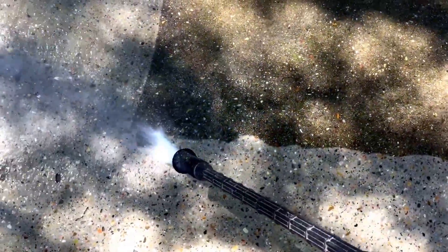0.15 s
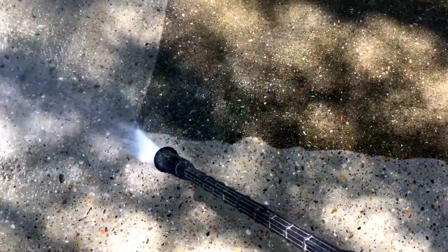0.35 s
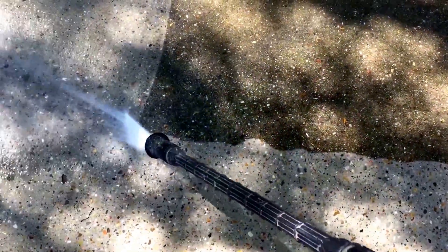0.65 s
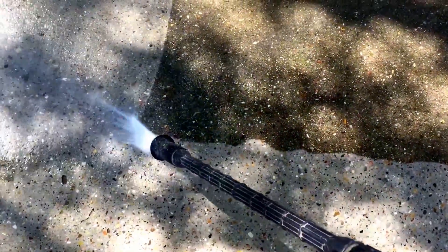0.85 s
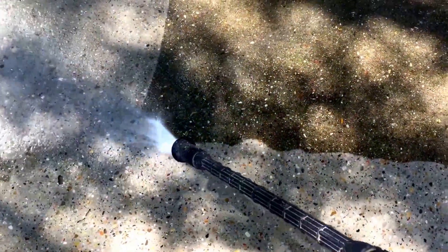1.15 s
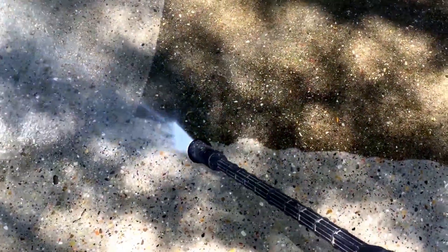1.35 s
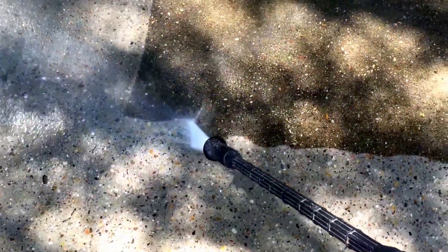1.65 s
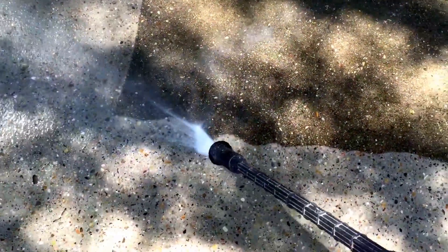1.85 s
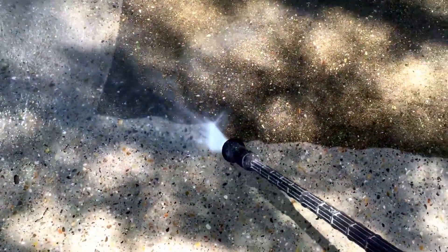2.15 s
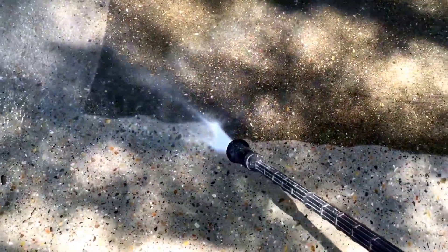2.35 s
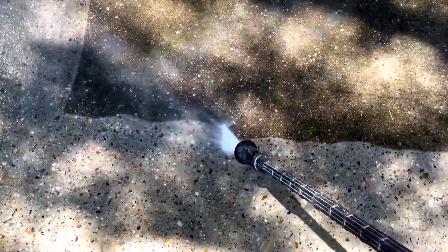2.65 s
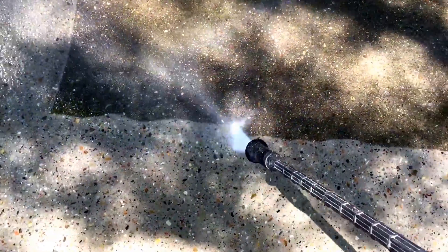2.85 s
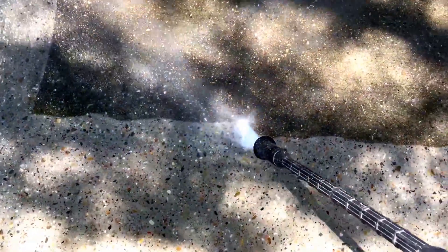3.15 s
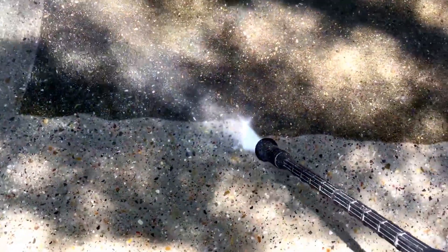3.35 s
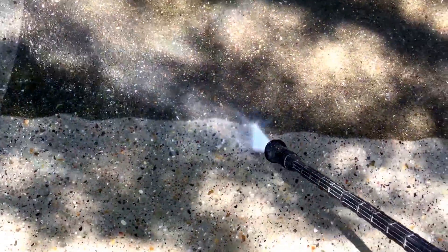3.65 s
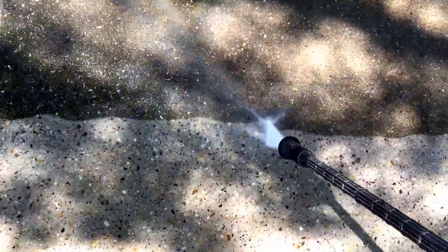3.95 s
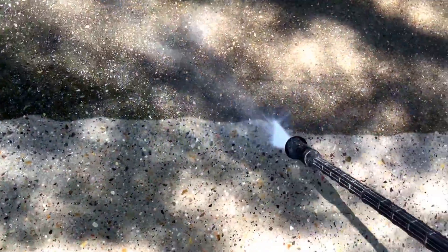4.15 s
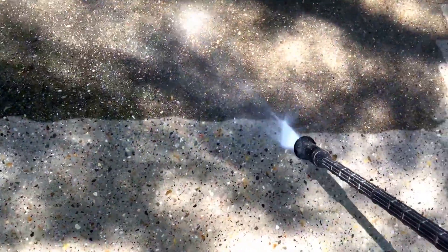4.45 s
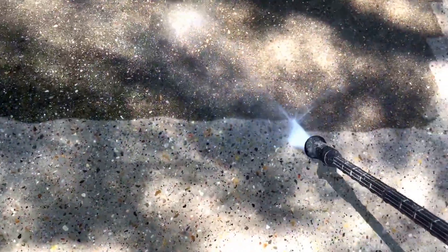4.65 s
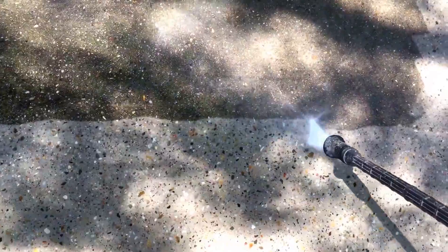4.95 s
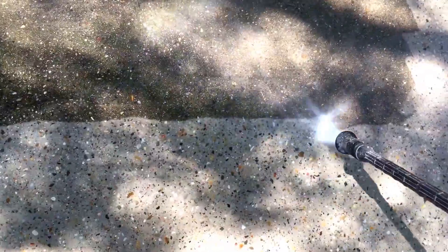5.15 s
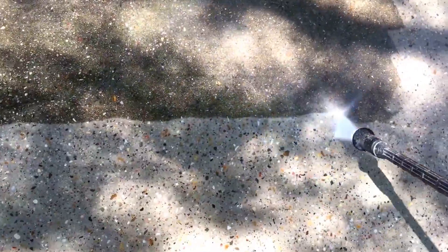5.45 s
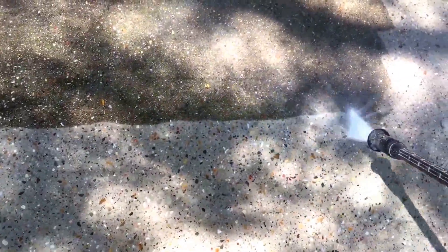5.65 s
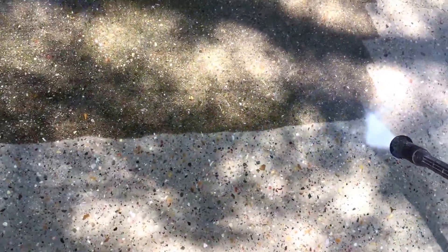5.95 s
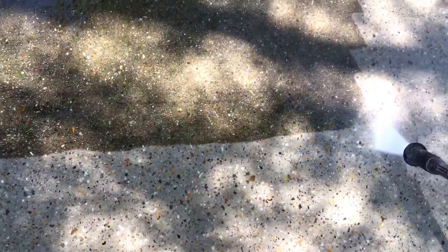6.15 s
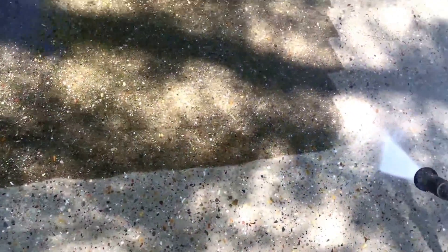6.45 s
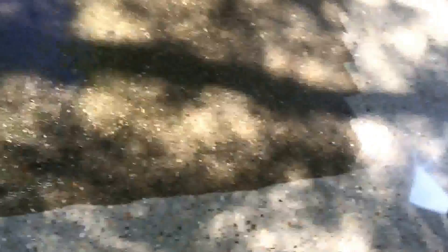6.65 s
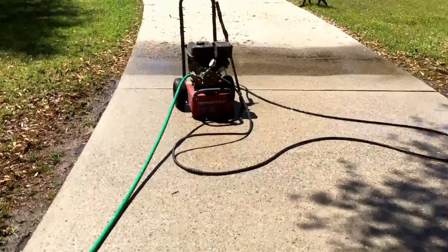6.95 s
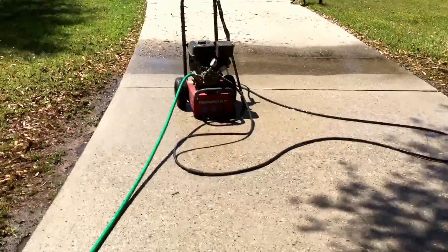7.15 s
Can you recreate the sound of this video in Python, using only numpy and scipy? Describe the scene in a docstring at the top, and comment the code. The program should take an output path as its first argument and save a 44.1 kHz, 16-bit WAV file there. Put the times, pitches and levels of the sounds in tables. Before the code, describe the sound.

Close, bright pressure-washer spray blasts a driveway while a one-cylinder engine drones and rattles; near the end everything drops suddenly to faint dull machine noise.

```python
"""On a concrete driveway, a petrol pressure washer is at work, with its wand close to the microphone.
The one-cylinder engine drones as a sum of partials, and its rattle is noise that beats with the pump.
The jet is hissing noise with hard drops in it, the water roars on the slab, and air thumps the microphone.
The sound then cuts to the running machine, much fainter: a low hum, dull noise, a rustle and small ticks."""
import sys
import numpy as np
from scipy import signal
from scipy.fft import rfft, irfft, next_fast_len
from scipy.io import wavfile

SR = 44100
rng = np.random.default_rng(int(sys.argv[2]) if len(sys.argv) > 2 else 0)


def store_pcm(level_fs):
    """Save levels as 16-bit WAV."""
    pcm = np.round(np.clip(level_fs, -1, 1) * 32767).astype(np.int16)
    wavfile.write(sys.argv[1], SR, np.atleast_2d(pcm).T)


N = 322803
T = np.arange(N) / SR  # time of every sample, in seconds
CUT_S = 6.8315  # the close work ends and the faint machine begins
TOP_HZ = 15720  # hardly anything is heard above this
PUMP_STROKES_PER_CYCLE = 6

# In every colour table, the levels only count relative to each other.

# The engine's governed speed, in firings per second.
GOVERNED_HZ = 25.079
# Under a sudden load the speed drops quickly and is won back slowly.
SAG_FALL_S, SAG_RECOVER_S = 0.07, 0.28
# Sags of the engine speed: lowest point t/s, depth/firings per second
SPEED_SAGS = [(.07, .11), (.3, .41), (1.26, .22), (1.66, .41), (2.92, .53), (4.13, .25), (4.84, .53),
              (5.47, .26), (6.19, .17)]
# Piston strokes of one firing cycle: place in the cycle/0-1, level/dB
PISTON_STROKES = [(.026, -.9), (.265, -2.5), (.451, 0), (.716, .3)]
# Strength the muffler gives each partial: multiple of the firing rate, relative level/dB
EXHAUST_PARTIALS = [(1, -31.5), (2, -7), (3, -10.5), (4, 0.5), (5, -3), (6, -3), (7, -20.5), (8, 0.5),
                    (9, -6.5), (10, -7.5), (11, -3.5), (12, -14.5), (13, -30.5), (14, -10), (15, -9.5),
                    (16, -15), (17, -15), (18, -25.5)]

# Loudness of the engine and pump rattle: t/s, level/dB
RATTLE_LEVEL = [(0, -30), (1.8, -29.8), (3, -28.5), (5.2, -28.8), (6.4, -31.5), (6.8, -30)]
# Colour of the rattle: f/Hz, level/dB
RATTLE_COLOUR = [(100, -37.5), (270, -19), (480, -22), (600, -11), (800, -6), (1000, -1.5), (1130, -1),
                 (1230, 0.5), (1450, -1.5), (1650, -7), (1850, -13.5), (2300, -19), (2900, -30),
                 (8000, -51.5)]

# The jet on the concrete: t/s, hiss level/dB, lift of the fine mist/dB
JET_LEVEL = [(0, -19.1, 1.8), (2.6, -19.5, 1), (3.05, -19.5, 0), (5.8, -20, 0.3), (6.82, -20.6, -2)]
# The wand swings to the right, then partly back: t/s, share of the way/0-1
WAND_SWING = [(0, 0), (2.7, 0.16), (2.9, 0.4), (4.2, 0.68), (5.2, 1), (6.1, .95), (6.8, 0.6)]
# Colour of the hiss at the left end of the swing: f/Hz, level/dB
HISS_LEFT_COLOUR = [(300, -32), (1500, -14.5), (2000, -4), (2500, -7), (2930, -4.5), (3400, -4),
                    (4400, -0.5), (5400, 1.5), (6800, -1), (7800, -6.5), (9000, -0.9), (10000, -3.5),
                    (12500, -9.5), (15700, -8.5)]
# Colour of the hiss at the right end of the swing: f/Hz, level/dB
HISS_RIGHT_COLOUR = [(300, -25), (1900, -10.5), (2500, -5.5), (3100, -11.5), (3900, -7), (4600, -6),
                     (5400, -2.5), (6600, -1.2), (7700, -5.5), (8800, -4.5), (10000, -6.5), (12500, -6),
                     (15700, -8)]

# Loudness of the water's low roar on the slab: t/s, level/dB
ROAR_LEVEL = [(0, -38.5), (.9, -34), (2, -39), (5.7, -39.7), (6.2, -36), (6.8, -38)]
# Colour of the roar: f/Hz, level/dB
ROAR_COLOUR = [(150, -32), (300, -6.5), (460, -7.5), (600, -1), (750, -1), (1100, -8), (2000, -30.5)]

# The steady draught with the wand at each end of its swing.
DRAUGHT_LEFT_DB, DRAUGHT_RIGHT_DB = -38.5, -47
# Gusts on the microphone: peak t/s, spread to each side of it/s, level/dB
DRAUGHT_GUSTS = [(0.55, .07, -34), (1.1, .13, -34.5), (1.45, .1, -38), (1.82, 0.11, -35),
                 (2.68, .17, -35.5), (3.42, .08, -35), (3.61, .05, -36), (5.07, .05, -38), (5.24, .07, -37)]
# Colour of the draught: f/Hz, level/dB
DRAUGHT_COLOUR = [(15, -37), (32, -18.5), (48, -3.5), (70, 2.5), (100, 0), (160, -2.5), (240, -7.5),
                  (400, -16), (900, -41)]

# The noise behind the faint machine starts at this level and slowly rises.
FAINT_START_DB, FAINT_RISE_DB_PER_S = -54.5, 4
# Colour of that noise: f/Hz, level/dB
FAINT_COLOUR = [(24, -38), (45, -11), (100, 3.5), (170, -9), (205, -1.5), (280, -25), (370, -21),
                (470, -29), (720, -8.5), (1000, -8.5), (1300, -7.5), (1650, -11.5), (2100, -23),
                (2700, -29), (4500, -39), (6200, -40), (15000, -54)]

# The rustle starts with the faint machine and dies away.
RUSTLE_START_DB, RUSTLE_FADE_DB_PER_S = -66, 31
# Small ticks: t/s, level/dB, share of dull knock/0-1
SMALL_TICKS = [(6.899, -64, .3), (6.972, -50, .6), (7.049, -50, .7), (7.061, -47, .9), (7.0698, -41, 0.2),
               (7.144, -58, .9)]
# Colour of the rustle and of the crisp part of a tick: f/Hz, level/dB
CRISP_COLOUR = [(300, -7), (1400, 6), (3000, -1), (4300, -7), (6500, 0), (9000, -7), (15000, -15)]
# Colour of the dull knock in a tick: f/Hz, level/dB
DULL_COLOUR = [(100, -12), (350, -4), (1400, -1), (2800, -4), (5000, -22), (12000, -35)]

# Narrow dips made by the microphone port: f/Hz, width/Hz, level/dB
MICROPHONE_DIPS = [(4890, 300, -3.5), (10440, 700, -4)]


def amp(db):
    """Turns decibels into a gain."""
    return 10 ** (np.asarray(db) / 20)


def unit(x):
    """Scales a signal to an rms of 1."""
    return x / np.sqrt(np.mean(x ** 2) + 1e-20)


def curve(rows, axis=1):
    """Reads one column of a time table at every sample."""
    rows = np.asarray(rows)
    return np.interp(T, rows[:, 0], rows[:, axis])


def colour(x, points):
    """Filters by a spectrum drawn on a log-frequency axis, then scales to rms 1."""
    hz, db = np.transpose(points)
    f = np.fft.rfftfreq(len(x), 1 / SR)
    gain = amp(np.interp(np.log(f + 1), np.log(hz), db))
    return unit(irfft(rfft(x) * gain, len(x)))


def noise(points):
    """Makes steady noise of a given colour."""
    return colour(rng.standard_normal(next_fast_len(N)), points)[:N]


def wander(rate_hz):
    """Makes a smooth random curve of rms 1, with little change faster than the given rate."""
    size = next_fast_len(N)
    f = np.fft.rfftfreq(size, 1 / SR)
    slow = rfft(rng.standard_normal(size)) / (1 + (f / rate_hz) ** 4)
    return unit(irfft(slow, size)[:N])


def hollow(x, hz, depth, width_hz=400):
    """Cancels a narrow band around a moving frequency."""
    # shift the band down to 0 Hz, smooth away the rest, then shift it back
    turn = np.exp(2j * np.pi * np.cumsum(hz) / SR)
    r = np.exp(-np.pi * width_hz / SR)
    low = signal.lfilter([1 - r], [1, -r], x / turn)
    band = 2 * (turn * low).real
    return x - np.clip(depth, 0, 1) * band


def firing_cycles():
    """Counts the engine's firings: a governed speed, with sags that share one shape."""
    speed = np.full(N, GOVERNED_HZ)
    for lowest_s, depth in SPEED_SAGS:
        side_s = np.where(T < lowest_s, SAG_FALL_S, SAG_RECOVER_S)
        speed = speed - depth * np.exp(-abs(T - lowest_s) / side_s)
    return np.cumsum(speed) / SR


def pump_wave(cycle):
    """The pump's push: three strokes to each of the two engine turns in a firing cycle."""
    return np.cos(2 * np.pi * PUMP_STROKES_PER_CYCLE * cycle)


def swing():
    """Where the wand points: 0 is left, 1 is right."""
    return np.clip(curve(WAND_SWING), 0, 1)


def since_cut():
    """Seconds since the faint machine began."""
    return np.maximum(T - CUT_S, 0)


def exhaust(cycle, unsteady=0.034, jitter_cycles=0.0016):
    """Each piston stroke pushes a puff through the muffler, which colours the partials of the note."""
    order, db = np.transpose(EXHAUST_PARTIALS)
    # the puffs strengthen or weaken each other, differently for every partial
    puffs = -sum(amp(d) * np.exp(-2j * np.pi * order * place) for place, d in PISTON_STROKES)
    # the muffler holds the upper partials back a little
    lags = np.angle(puffs) - 0.004 * order ** 2
    # no two firings are quite alike
    uneven = cycle + jitter_cycles * wander(14)
    note = np.zeros(N)
    # only the timing of the puffs is used: the table already gives the strengths
    for k, d, lag in zip(order, db, lags):
        note = note + amp(d) * np.cos(2 * np.pi * k * uneven + lag)
    return unit(note) * (1 + unsteady * wander(13.5))


def rattle(cycle, beat=0.12, flutter_db=1.0):
    """Valve gear and pump pistons shake the casing: noise that beats with the pump strokes."""
    strokes = 1 + beat * pump_wave(cycle)
    level_db = curve(RATTLE_LEVEL) + flutter_db * wander(30)
    return noise(RATTLE_COLOUR) * strokes * amp(level_db)


def water_impacts(drops_per_s=2500, drops_db=-9):
    """Water shatters on the concrete: dense noise with single hard drops of random strength."""
    size = next_fast_len(N)
    strength_db = 4 * np.minimum(rng.exponential(1, size), 2.5)
    lands = rng.random(size) < drops_per_s / SR
    drops = rng.choice([-1, 1], size) * amp(strength_db) * lands
    return rng.standard_normal(size) + amp(drops_db) * unit(drops)


def jet(cycle, ripple=0.066, grit_fast_db=0.28, grit_slow_db=0.32, mist_hz=10500):
    """The impacts of the water make a hiss, coloured by the wand's swing and pulsing with the pump."""
    impacts = water_impacts()
    way = swing()
    left = colour(impacts, HISS_LEFT_COLOUR)[:N]
    right = colour(impacts, HISS_RIGHT_COLOUR)[:N]
    hiss = (1 - way) * left + way * right
    # a near reflection cancels one band, which rises and fills in as the wand swings away
    null_hz = 2870 + 250 * way
    null_depth = 0.73 * (1 - 1.4 * way)
    hiss = hollow(hiss, null_hz, null_depth)
    # the finest droplets give the top of the hiss
    high_pass = signal.butter(4, mist_hz, "high", fs=SR, output="sos")
    mist = signal.sosfiltfilt(high_pass, hiss)
    hiss = hiss + mist * (amp(curve(JET_LEVEL, axis=2)) - 1)
    # the jet crosses pebbles and pits in the concrete
    grit_db = grit_fast_db * wander(70) + grit_slow_db * wander(11)
    pulse = 1 + ripple * pump_wave(cycle)
    return unit(hiss) * pulse * amp(curve(JET_LEVEL) + grit_db)


def roar(flutter_db=0.5):
    """The sheet of water driven across the slab: low noise with a slight flutter."""
    return noise(ROAR_COLOUR) * amp(curve(ROAR_LEVEL) + flutter_db * wander(14))


def draught(lumps_db=1.0):
    """Air dragged along by the spray thumps the microphone: less with the wand at the right, more in gusts."""
    steady = amp(DRAUGHT_LEFT_DB + (DRAUGHT_RIGHT_DB - DRAUGHT_LEFT_DB) * swing())
    power = steady ** 2
    for peak_s, spread_s, db in DRAUGHT_GUSTS:
        gust = amp(db) * np.exp(-0.5 * ((T - peak_s) / spread_s) ** 2)
        power = power + gust ** 2
    return noise(DRAUGHT_COLOUR) * np.sqrt(power) * amp(lumps_db * wander(6))


def faint_machine(cycle, muffle_hz=220):
    """The running machine, faint and dull: its low exhaust hum and noise, without the hiss of the jet."""
    air_db = FAINT_START_DB + FAINT_RISE_DB_PER_S * since_cut()
    air = amp(air_db) * noise(FAINT_COLOUR)
    low_pass = signal.butter(2, muffle_hz, fs=SR, output="sos")
    # the gain acts on the whole exhaust note, before the low-pass takes its share
    hum = signal.sosfilt(low_pass, amp(-62) * exhaust(cycle, unsteady=0.2))
    return hum + air + rustle_and_ticks()


def rustle_and_ticks(decay_s=0.0012, tail_s=0.018, tail_db=-19, crinkle_db=3.5):
    """A soft uneven rustle, and short bursts of noise that are part crack and part knock."""
    crisp, dull = noise(CRISP_COLOUR), noise(DULL_COLOUR)
    rustle_db = RUSTLE_START_DB - RUSTLE_FADE_DB_PER_S * since_cut() + crinkle_db * wander(90)
    out = crisp * amp(rustle_db)
    for start_s, db, knock in SMALL_TICKS:
        age = abs(T - start_s)
        # a quick fall, then a weaker and longer tail
        fall = (T >= start_s) * (np.exp(-age / decay_s) + amp(tail_db) * np.exp(-age / tail_s))
        out = out + amp(db) * fall * ((1 - knock) * crisp + knock * dull)
    return out


def scene():
    """The close work, then the abrupt cut to the faint machine; both channels are alike."""
    cycle = firing_cycles()
    close = amp(-29.0) * exhaust(cycle) + rattle(cycle) + jet(cycle) + roar() + draught()
    mono = np.where(T < CUT_S, close, faint_machine(cycle))
    return np.array([mono, mono])


def record(dry):
    """The microphone port dips two narrow bands, then a steep low-pass removes the very top."""
    size = next_fast_len(N + 4096)
    f = np.fft.rfftfreq(size, 1 / SR)
    port_db = sum(db * np.exp(-(2 * (f - hz) / width) ** 2) for hz, width, db in MICROPHONE_DIPS)
    heard = irfft(rfft(dry, size) * amp(port_db), size)[:, :N]
    low_pass = signal.firwin(1023, TOP_HZ, window=("kaiser", 9), fs=SR)
    return signal.oaconvolve(heard, low_pass[None], "same")


dry = scene()
out = record(dry)
store_pcm(out)
```